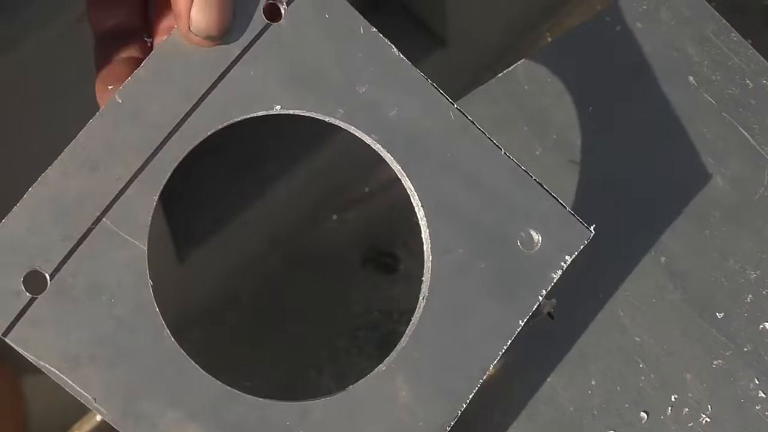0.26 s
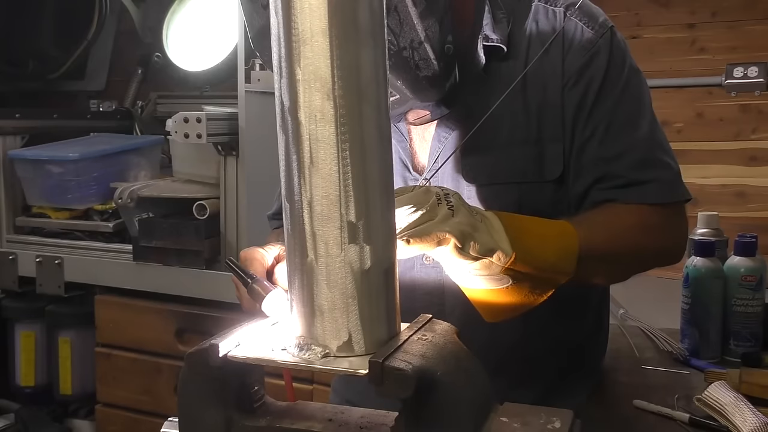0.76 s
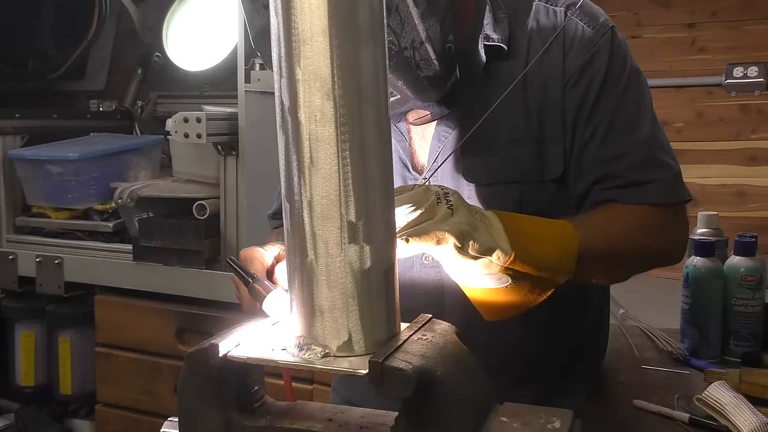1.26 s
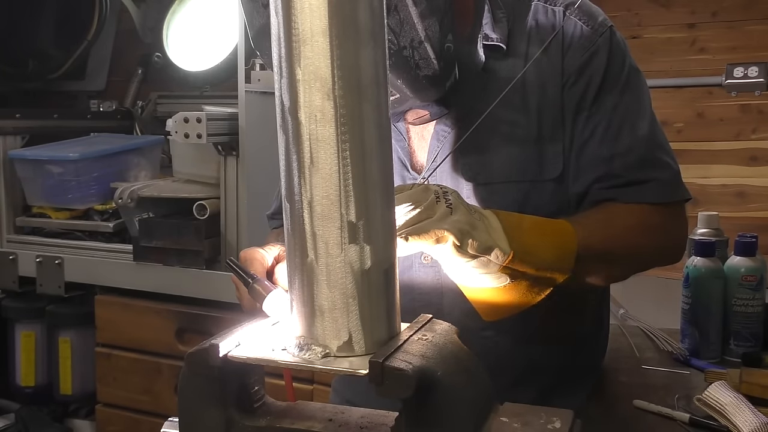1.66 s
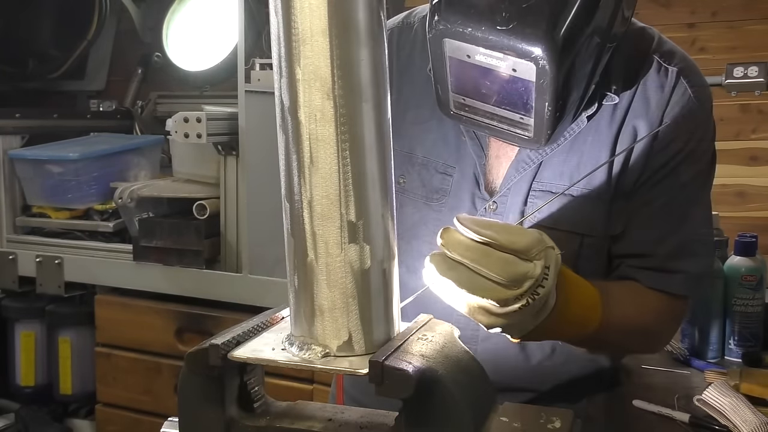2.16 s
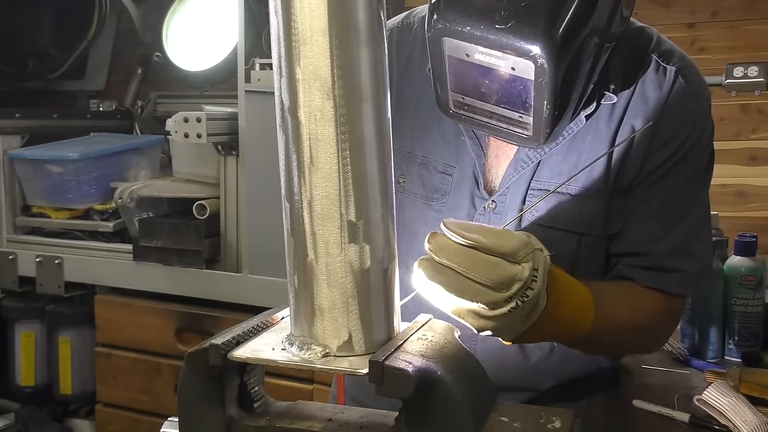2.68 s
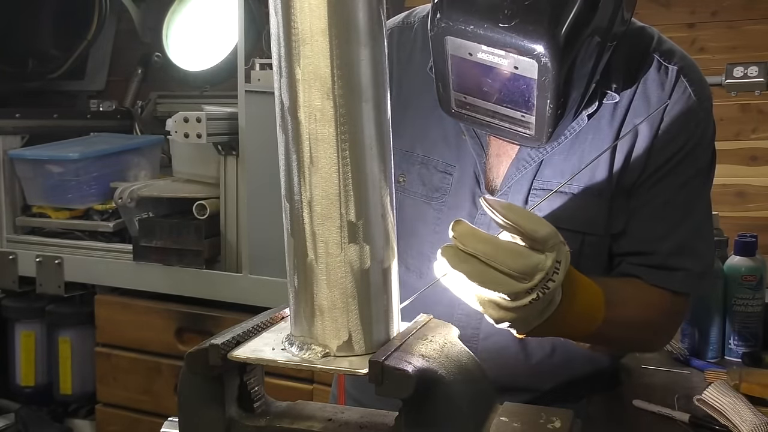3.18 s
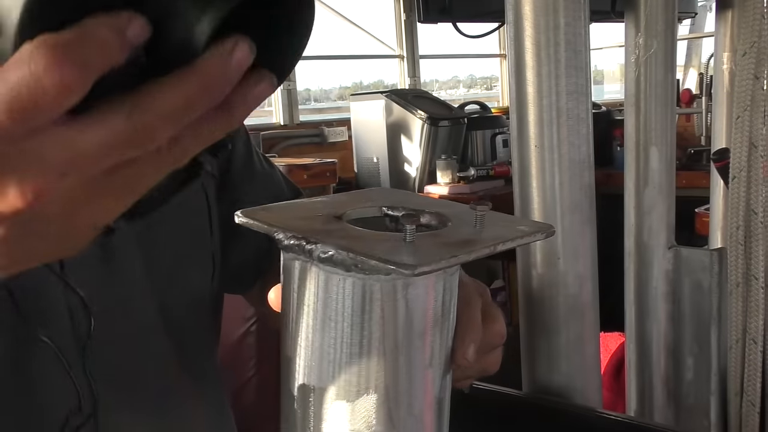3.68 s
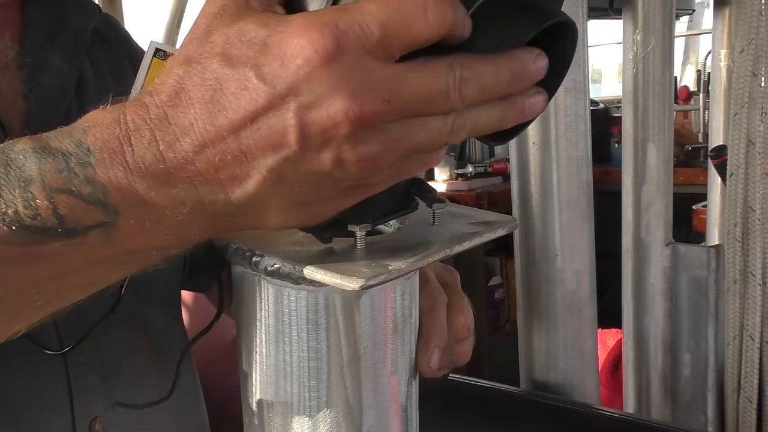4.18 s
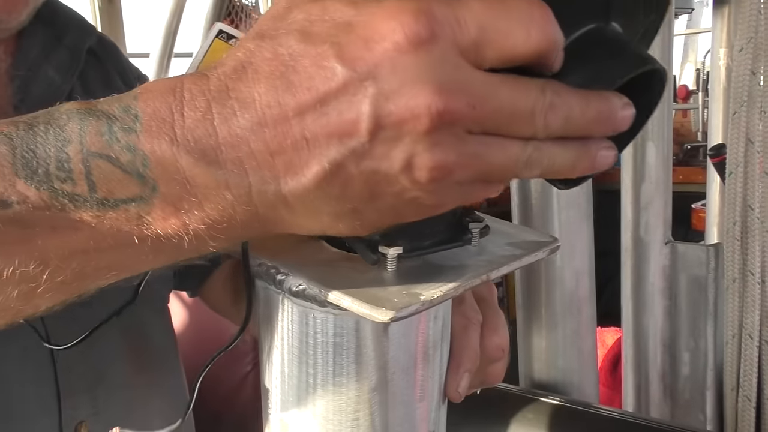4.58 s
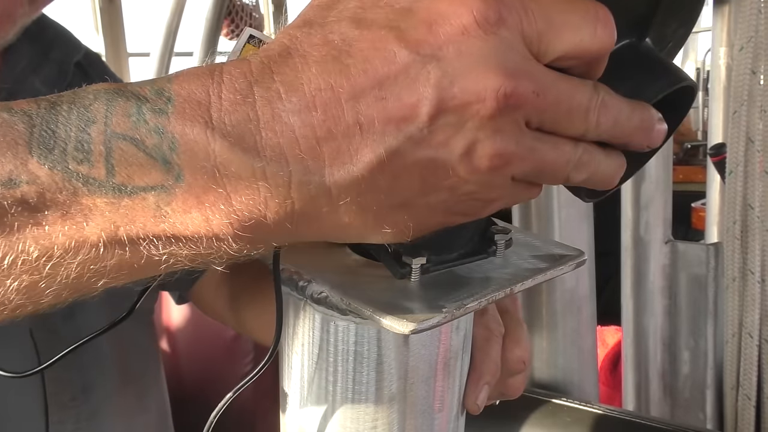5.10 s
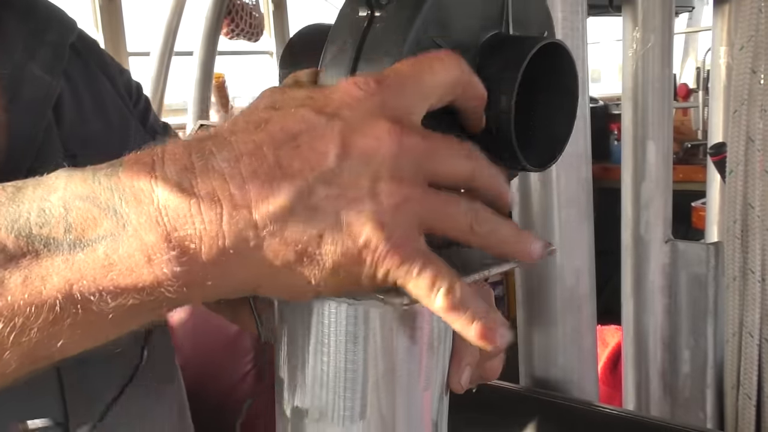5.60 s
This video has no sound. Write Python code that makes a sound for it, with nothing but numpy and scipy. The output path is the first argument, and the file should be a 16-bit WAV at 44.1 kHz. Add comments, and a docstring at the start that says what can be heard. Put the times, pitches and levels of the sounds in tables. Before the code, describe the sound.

A saw motor whines downward for half a second, then a harsh welding arc buzzes and crackles before hands knock a plastic housing onto metal.

```python
"""A workshop, heard in mono as three scenes cut together.
A saw motor runs down: gliding motor tones and rushing air, with fixed blade tones ringing as they are shaken.
An alternating-current welding arc buzzes on aluminium: clicks at each current flip with sizzle between them;
one weld fades into another. Then hands seat a plastic blower housing on an aluminium flange: decaying tones
make the knocks, short sine blips the ticks, and shaped noise the rubbing and low rumble."""
import sys
import numpy as np
from scipy import signal
from scipy.fft import rfft, irfft
from scipy.io import wavfile
from scipy.ndimage import uniform_filter1d

SR = 44100
rng = np.random.default_rng(int(sys.argv[2]) if len(sys.argv) > 2 else 0)


def int16_out(signal):
    """Quantize to a 16-bit WAV file."""
    q = np.round(np.clip(np.atleast_2d(signal).T, -1, 1) * 32767)
    wavfile.write(sys.argv[1], SR, q.astype(np.int16))


N = 257664
TIME = np.arange(N) / SR

# All levels are relative within their own sound unless a comment says otherwise.
# Motor, fan and gear tones: multiples of the shaft rate
SHAFT_MULTIPLES = [1, 7, 8, 9, 10, 12, 13, 14, 15, 16, 17, 24]
# Level of each of those tones: start_db, cut_db
SAW_TONE_LEVELS = [(-28.5, -43), (-36, -18), (-19.5, -20.5), (-18, -22), (-33, -15), (-17.5, -23.5),
                   (-32, -17), (-29, -18), (-16, -28), (-7, -26), (-34, -29), (-24, -26)]
# Ringing tones of the blade: pitch_hz, width_hz (each dies 60 dB in 0.51 / width_hz seconds), level_db
BLADE_MODES = [(2700, 42, -16), (3200, 72, -26), (3550, 30, -20), (3750, 25, -13.5), (3620, 25, -16),
               (4030, 20, -17), (4146, 20, -11.5), (4300, 18, -17), (4280, 93, -31), (5570, 30, -15.5),
               (7450, 150, -12.5), (10550, 370, -8)]
# Colour of the saw's cooling air: pitch_hz, level_db (per Hz)
SAW_AIR_COLOUR = [(18, -40), (30, -24), (134, -9.5), (215, -19), (266, -13), (319, -16), (415, -7),
                  (1190, -1), (1760, -3.5), (2410, -1), (2680, -1), (4190, -1), (4780, -4), (11100, -12.5),
                  (16000, -11.5)]
# Timing of each weld: first_flip_s, cycles_hz, wait_for_flip_back_s, pulse_sign
WELD_CYCLE_1 = (.49607, 59.413, .00342, 1)
WELD_CYCLE_2 = (1.59564, 59.417, .00343, -1)
# Colour of the crack at the flip back: pitch_hz, level_db (per Hz)
CRACK_COLOUR_1 = [(60, -56), (300, -29), (600, 3), (1200, 2), (2400, 2), (3600, 5.5), (5000, 2.5),
                  (7100, -4.5), (9000, -2), (11500, 2.5), (14300, 2.5), (16000, -4)]
CRACK_COLOUR_2 = [(60, -33.5), (300, -8), (600, -5), (1200, 3.5), (2400, 4), (3600, 1.5), (5500, 1.5),
                  (9000, -4.5), (12000, 3), (14500, 0), (16000, -1)]
# Colour of the sizzle: pitch_hz, level_db (per Hz)
SIZZLE_COLOUR_1 = [(60, -10), (200, -15), (500, -10), (1000, 0), (2000, -4), (3600, -1), (4600, 0),
                   (6200, -4.5), (11000, 6), (16000, -4)]
SIZZLE_COLOUR_2 = [(60, -56), (200, -7.5), (500, -6.5), (1000, -2.5), (2000, -4.5), (3200, -3), (4600, 1.5),
                   (6500, -5), (9000, 6), (12000, 0), (16000, 0.5)]
# Main reflections off bench and work: delay_ms, signed_share
REFLECTIONS_1 = [(1.52, -0.37), (1.86, 0.23), (2.61, 0.27), (3.76, -0.28), (4.04, -0.24), (5.31, 0.32),
                 (5.65, -0.32), (8.78, -0.22), (12.63, 0.2)]
REFLECTIONS_2 = [(0.48, -0.48), (1.0, -0.3), (1.16, 0.3), (1.41, 0.37), (1.59, 0.62), (2.56, 0.46),
                 (4.65, -0.29), (7.35, -0.35), (9.89, -0.3)]
# Strengthened harmonics of the arc's buzz: pitch_hz, level_db
BUZZ_HARMONICS_1 = [(297, -23), (594, -50), (951, -42), (1129, -38), (1188, -54), (1426, -43),
                    (1485, -51.5), (1782, -42), (2079, -44), (3565, -45.5)]
BUZZ_HARMONICS_2 = [(178, -26), (297, -36.5), (594, -27), (653, -28), (891, -35), (951, -38.5), (1040, -45),
                    (1129, -34.5), (1188, -39), (1485, -37.5), (1842, -34.5), (3060, -46), (3327, -50),
                    (3921, -29)]
# Sputter surges of the arc: peak_s, build_up_s, level_db
SPUTTER_SURGES = [(0.599, 0.0072, -39), (1.555, 0.0035, -30.5), (2.1, 0.18, -32.5), (2.18, 0.048, -29),
                  (2.261, 0.042, -32.5), (2.55, 0.051, -37), (2.64, 0.14, -27.5), (2.823, 0.017, -32),
                  (2.87, 0.047, -27.5), (2.94, 0.015, -39), (3.313, 0.008, -24), (3.39, 0.036, -41),
                  (3.45, 0.013, -37)]
# Level of the second arc as the torch moves: time_s, level_db
ARC_2_LEVEL = [(1.6, 4), (2.1, 0), (2.5, -1.5), (2.78, -1), (3.0, 0), (3.2, -2.5), (3.47, -2)]
# Strokes of the hands over the housing: peak_s, build_up_s, dying_s, rub_db, treble_db, scrape_hz
HAND_STROKES = [(3.53, 0.059, 0.023, -47.5, -45.5, 4060), (3.615, 0.015, 0.038, -55, -59, 2330),
                (3.68, 0.038, 0.027, -47, -63, 1300), (3.875, 0.02, 0.045, -38, -56, 1700),
                (3.945, .02, .02, -48, -60, 1510), (3.99, 0.013, 0.0047, -41, -48, 1340),
                (4.055, 0.019, 0.018, -46.5, -68, 1570), (4.1, .01, 0.0067, -57, -74, 2500),
                (4.49, 0.025, 0.02, -31, -51, 1470), (5.33, 0.078, 0.19, -57, -64, 1820),
                (5.47, 0.032, 0.057, -43, -75, 900), (5.6, 0.013, 0.026, -48, -50, 3750),
                (5.69, 0.042, 0.063, -41, -44.5, 1480), (5.779, 0.067, 0.019, -37, -40.5, 1220)]
# Colour of the low rumble: pitch_hz, level_db (per Hz)
RUMBLE_COLOUR = [(15, -73), (25, -29), (80, -9.5), (118, 2), (150, -4), (221, 2), (375, -16), (500, -13.5),
                 (650, -16), (1100, -120)]
# Level of the rumble over time: time_s, level_db
RUMBLE_LEVELS = [(3.48, -37.5), (4.17, -38), (4.7, -43.5), (5.4, -43.5), (5.6, -49.5), (5.84, -43)]
# Colour of the rubbing: pitch_hz, level_db (per Hz)
RUB_COLOUR = [(300, -2.5), (600, 2), (1300, -0.5), (2000, -1), (2900, -5.5), (3800, -2), (5000, -11.5),
              (8000, -28)]
# Colour of the rubbing's treble: pitch_hz, level_db (per Hz)
RUB_TREBLE_COLOUR = [(3000, -46), (5000, 8), (8000, 10), (12000, 6.5), (16000, 5.5)]
# Knocks of the housing: start_s, level_db, hollow_boom_db, brightness_db, flange_ring_db, skid_ms
HOUSING_KNOCKS = [(3.666, -22.5, -10, 8, 1, 0.48), (3.8636, -24, -5, 9.5, -6, 0.31),
                  (4.019, -35, -8, -3, -15, 2.7), (4.262, -41, -4, 4, 3, 1),
                  (4.3122, -5.5, -1.5, 8.5, 9, 0.098), (4.355, -10.5, 5.5, 2, 13, 0.12),
                  (4.4455, -23.5, -4, 1, -10, 0.24), (4.465, -37, 4, 14, -10, 2),
                  (4.478, -4, -14.5, -4, -2, 0.18), (4.497, -23, 2.5, 4, 5.5, 1.13),
                  (4.652, -46, 15, -18, -20, .1), (4.922, -37, 6, -5, -13, 0.093),
                  (5.107, -45, 16, -8, -15, 0.44), (5.3828, -50.5, 27, 5, -3, 2.4),
                  (5.427, -7.5, 4, 5, -4, 1.59), (5.4378, -9, 12, -20, -30, 1.25),
                  (5.584, -46, 7, 11, -8, 2.8), (5.716, -19, -11.5, 2, -14, 7),
                  (5.76, -25.5, -18, -9, -20, 3.3)]
# Tones of the plastic housing: pitch_hz, level_db, decay_s (to -60 dB; knocks rescale it)
HOUSING_MODES = [(460, 20.5, 0.0081), (570, 3, 0.049), (663, 14, 0.039), (800, 17.5, 0.023),
                 (1040, 19, 0.02), (1185, 2, 0.083), (1640, 1.5, 0.082), (1757, 19, 0.015),
                 (1970, 9, 0.045), (2650, 8, 0.0048)]
# Tones of the metal flange: pitch_hz, level_db, decay_s (to -60 dB)
FLANGE_MODES = [(2050, -11, .2), (2260, -10, 0.17), (3030, -19, 0.12), (3130, -6.5, 0.21),
                (3280, -18, 0.39), (3760, 3, 0.13), (3870, 22, 0.009), (3800, -16, 0.11), (4023, -8, 0.27),
                (4235, -9.5, 0.43), (4960, -13, 0.28), (5300, -8, 0.2), (6700, -5, .08), (7600, -4, .12),
                (8900, -1, 0.13), (13870, -1, .1)]
# Thin ticks: start_s, level_db, pitch_hz
THIN_TICKS = [(4.477, -21, 10500), (4.484, -31, 11000), (4.505, -18, 3500), (4.63, -33, 6000),
              (4.875, -33, 8000), (4.957, -33, 5500), (5.487, -32, 9500), (5.78, -19, 3200),
              (5.83, -25, 4480)]

# Saw: shaft rate at the start, and its loss each second
SAW_HZ, SAW_SLOWING_HZ_PER_S = 282, 113
SAW_DB, SAW_CUT_S = -12.5, 0.5035
BLADE_DRIVE_DB = 4  # a tone gliding through a blade mode shakes it this much harder than the air does
# Welds
WELD_FADE_S, WELD_CUT_S = (1.682, 2.24), 3.472
SPIT_HZ, FRESH_SHARE = 6000, 0.5  # spit and sizzle lie above this pitch; sizzle that is new each cycle
SPUTTER_DB, SURGE_FALL_S, BURST_FALL_S = -54, 0.044, 0.006  # quiet sputter; time for a fall to 37 %
SURGE_DUCK_DB = 70  # the clicks weaken by this many dB per unit of sputter amplitude
PING_HZ, PING_T60_S, PING_DB = 3250, 0.023, -2  # a surging relight also rings this pitch
SCATTER_T60_S, SCATTER_HZ = 0.02, 4200  # dense small reflections near the arc, treble only
HARMONIC_DAMP_HZ = 3940  # strengthened harmonics at this pitch die twice as fast as the lowest pitches
WALL_DB, WALL_T60_S = -26.5, 0.1
# Hands
REST_RUB_DB, REST_TREBLE_DB = -9.5, -17  # faint rubbing between strokes, relative to the rumble
SCRAPE_DB, SCRAPE_T60_S = 1, 0.013  # pitched scrape relative to the hiss; ring time of its pitch
SLIPS_PER_S = 43  # slips that shake each housing mode
# Knocks
KNOCK_T60_S, CONTACT_MS = 0.034, 1.47
FLANGE_DB, KNOCK_TOP_DB = -12.5, -15.5
ROOM_T60_S, ROOM_DB = 0.33, -16
TOP_HZ = 15750


def undb(db):
    """Turn decibels into an amplitude factor."""
    return 10 ** (np.asarray(db) / 20)


def unit(x):
    """Scale a sound to an average (RMS) level of 1."""
    return x / np.sqrt(np.mean(x ** 2))


def noise():
    """Fresh white noise, as long as the whole sound."""
    return rng.standard_normal(N)


def curves(table):
    """Columns of a table joined by straight lines in time."""
    s, *columns = np.transpose(table)
    return [np.interp(TIME, s, c) for c in columns]


def colour(x, spectrum, size=2048, causal=True):
    """Filter through (pitch, level) points: reacting as early as possible, or symmetric in time."""
    hz, db = np.transpose(spectrum)
    bins_hz = np.arange(size // 2 + 1) * SR / size
    log_gain = np.interp(np.log(bins_hz + 1), np.log(hz), db) * np.log(10) / 20
    if not causal:
        kernel = np.roll(irfft(np.exp(log_gain)), size // 2)
        return signal.oaconvolve(x, kernel)[size // 2:size // 2 + len(x)]
    # folding the cepstrum gives the minimum-phase filter
    cepstrum = irfft(log_gain)
    cepstrum[1:size // 2] *= 2
    cepstrum[size // 2 + 1:] = 0
    return signal.oaconvolve(x, irfft(np.exp(rfft(cepstrum))))[:len(x)]


def highpass(x, hz, order=2):
    """Keep what lies above a pitch."""
    return signal.sosfilt(signal.butter(order, hz, "high", fs=SR, output="sos"), x)


def ring(x, hz, t60):
    """One tone that x sets ringing and that dies by 60 dB in t60 seconds."""
    pole = np.exp(2j * np.pi * hz / SR - np.log(1000) / (t60 * SR))
    return signal.lfilter([1], [1, -pole], x).imag


def clicks(s, size, length=N):
    """Impulses at exact times, even between samples (windowed sinc)."""
    at, taps, out = np.asarray(s) * SR, np.arange(-7, 9), np.zeros(length + 16)
    gap = taps - (at % 1)[:, None]
    places = np.clip(at.astype(int)[:, None] + taps, 0, length)
    shape = np.sinc(gap) * np.cos(np.pi * gap / 18) ** 2
    np.add.at(out, places, shape * np.asarray(size)[:, None])
    return out[:length]


def walk(rate):
    """Random levels, rate of them a second, joined by slopes; spread near 1."""
    k = int(SR / rate)
    return uniform_filter1d(np.repeat(rng.standard_normal(N // k + 1), k), k)[:N]


def swells(s, rise_s, fall_s, db):
    """Amplitude that builds up to each peak and dies away exponentially."""
    late = TIME - s[:, None]
    pace_s = np.where(late < 0, rise_s[:, None], np.reshape(fall_s, (-1, 1)))
    return undb(db) @ np.exp(-np.abs(late) / pace_s)


def cut(start, end, fade_s=0.0035):
    """An edit: sound only between two moments, with short fades."""
    return np.clip(np.minimum(TIME - start, end - TIME) / fade_s, 0, 1)


def saw():
    """Motor tones glide down; the blade's fixed tones ring as air and passing motor tones shake it."""
    shaft_hz = np.maximum(SAW_HZ - SAW_SLOWING_HZ_PER_S * TIME, 100)
    turn = 2 * np.pi * np.cumsum(shaft_hz) / SR
    tones = 0
    for multiple, levels in zip(SHAFT_MULTIPLES, SAW_TONE_LEVELS):
        level_db = np.interp(TIME, (0, SAW_CUT_S), levels) + 3.9 * walk(44.8)
        angle = multiple * (turn + 0.054 * walk(92.5)) + rng.uniform(0, 2 * np.pi)
        tones = tones + undb(level_db) * np.sin(angle)
    on = cut(-1, SAW_CUT_S, fade_s=0.0042)
    blade = 0
    for hz, width_hz, db in BLADE_MODES:
        shake = on * (noise() + undb(BLADE_DRIVE_DB) * tones)
        blade = blade + undb(db - 13.0 + 2 * walk(6.1)) * unit(ring(shake, hz, 0.51 / width_hz))
    air = undb(-2.5 + walk(63.3)) * unit(colour(noise(), SAW_AIR_COLOUR))
    return (np.sqrt(2) * tones + blade + air) * undb(SAW_DB) * on


def sizzle_noise(flips, cycle, burn_s, level):
    """Treble noise burns from each relight until shortly after the flip back, then dies quickly."""
    first, hz, wait, _ = cycle
    burn = lambda age: np.exp(-np.maximum(age - wait - burn_s, 0) / 0.00072)
    # most of it repeats from cycle to cycle, the rest is new each time
    pattern = burn(TIME[:512]) * rng.standard_normal(512)
    same = signal.oaconvolve(clicks(flips, undb(level)), pattern)[:N]
    fresh = burn((TIME - first) % (1 / hz)) * noise()
    return highpass(same + FRESH_SHARE * fresh, SPIT_HZ)


def sputter_bursts(cycle, snap, burst_level, sputter):
    """In a surge each relight bursts unevenly in one band of noise and rings a ping."""
    first, hz, _, _ = cycle
    k = np.clip(((TIME - first) * hz).astype(int), 0, len(burst_level) - 1)
    since = (TIME - first) % (1 / hz)
    burst = np.exp(-since / BURST_FALL_S) * undb(1.8 * burst_level[k])
    band = [(1500, -33), (2900, 4.5), (3500, 8), (4300, -5.0), (6500, -34)]
    bursts = sputter * unit(colour(burst * noise(), band))
    return bursts + sputter * undb(PING_DB) * unit(ring(snap, PING_HZ, PING_T60_S))


def scattered_treble(arc, wander_db):
    """Treble scatters off torch, hands and clamps along three paths; as they move, its colour shifts."""
    treble = highpass(arc, SCATTER_HZ)
    paths = rng.standard_normal((3, 2048)) * 1000 ** (-TIME[:2048] / SCATTER_T60_S)
    mix = undb([wander_db * walk(4.11) for _ in paths])
    mix = mix / np.sqrt(np.mean(mix ** 2, axis=0))
    scatter = 0
    for m, p in zip(mix, paths):
        scatter = scatter + m * signal.oaconvolve(treble, p / np.sqrt(np.sum(p ** 2)))[:N]
    return scatter


def arc_response(echo, harmonics, wait, echo_hz, harmonics_t60):
    """Each arc pulse comes direct, off bench and walls, and with dying tones that strengthen buzz harmonics."""
    delay, share = np.transpose(echo)
    t = np.arange(4096) / SR
    path = 0
    # early reflections keep more edge, those later than 3 ms come back dull
    for edge_hz, some in ((echo_hz, delay < 3), (4500, delay >= 3)):
        dulling = signal.butter(1, min(edge_hz, 20000), fs=SR)
        path = path + signal.filtfilt(*dulling, clicks(delay / 1000, share * some, length=4096))
    for j, (hz, db) in enumerate(harmonics):
        decay = 1000 ** (-t / harmonics_t60 * (1 + hz / HARMONIC_DAMP_HZ))
        path = path + (-1) ** j * undb(db) * np.sin(2 * np.pi * hz * t) * decay
    path[0] += 1
    # the walls return each pulse as the same dense tail
    tail = rng.standard_normal(len(t)) * 1000 ** (-t / WALL_T60_S) * (t > wait)
    path = path + undb(WALL_DB) * colour(tail, [(1500, -30.5), (3000, -0.5), (4500, 1), (7000, -13)])
    return path / np.sqrt(np.sum(path ** 2))


def weld(cycle, click_db, crack, sizzle, echo, harmonics, thud_hz, thud_db, spit_db, burn_s, glance, wander_db,
         steady_db, rest_db, gas_top_db, echo_hz, harmonics_t60, fan_hz, fan_db):
    """Current flips twice a cycle: a dull thud at relight, a sharp crack at the flip back, sizzle between."""
    first, hz, wait, sign = cycle
    flips = np.arange(first, N / SR - .02, 1 / hz)
    chance = rng.standard_normal((len(flips), 7)).T
    crack_shift, crack_level, thud_shift, thud_level, spit_shift, spit_level, sizzle_level = chance
    sharp = clicks(flips + wait + 3e-6 * crack_shift, sign * undb(.4 * crack_level))
    thud = clicks(flips + 8e-6 * thud_shift, sign * undb(thud_db + 0.43 * thud_level))
    thud = signal.filtfilt(*signal.butter(2, thud_hz, fs=SR), thud)
    # the relight also spits: a crack of very uneven strength
    spit = clicks(flips + 5e-5 * spit_shift, sign * undb(spit_db + 6 * spit_level))
    spit = signal.sosfiltfilt(signal.butter(2, SPIT_HZ, "high", fs=SR, output="sos"), spit)
    s, rise_s, surge_db = np.transpose(SPUTTER_SURGES)
    sputter = undb(SPUTTER_DB) + swells(s, rise_s, SURGE_FALL_S, surge_db)
    arc = undb(click_db - SURGE_DUCK_DB * sputter) * unit(colour(sharp + thud + spit, crack, causal=sign < 0))
    fizz = sizzle_noise(flips, cycle, burn_s, sizzle_level)
    arc = arc + undb(steady_db) * unit(colour(fizz, sizzle))
    # an even, duller hiss of shielding gas lies under the sizzle
    gas = colour(colour(noise(), sizzle), [(4000, 0), (12000, gas_top_db)])
    gas = undb(rest_db) * unit(gas)
    snap = clicks(flips + 2e-5 * spit_shift, sign * undb(2.5 * spit_level))
    surge = sputter_bursts(cycle, snap, spit_level, sputter)
    # in a surge both flips also crack in one band close to that of the bursts
    surge_crack = colour(snap + sharp, [(2300, -31.5), (3100, 5.0), (4300, 5.5), (5500, -33.5)])
    arc = arc + sputter * undb(1.5) * unit(surge_crack)
    arc = arc + sputter * undb(-14.0) * unit(colour(snap, crack))
    arc = arc + glance * scattered_treble(arc, wander_db)
    path = arc_response(echo, harmonics, wait, echo_hz, harmonics_t60)
    near = signal.oaconvolve(arc, path)[:N] + surge + gas
    # low drone of the welder: noise through the same narrow ring twice
    fan = undb(fan_db) * unit(ring(ring(noise(), fan_hz, 0.12), fan_hz, 0.12))
    return highpass(near, 120, order=4) + fan  # the arc, sizzle and gas keep nothing deep below 120 Hz; only the drone lies lower


def hands():
    """Low rumble, and skin and cable rubbing on plastic: noise with scattered slips that rattle the housing."""
    s, rise_s, fall_s, rub_db, treble_db, scrape_hz = np.transpose(HAND_STROKES)
    rumble_db = curves(RUMBLE_LEVELS)[0]
    rumble = undb(rumble_db + 2.0 * walk(6.7)) * unit(colour(noise(), RUMBLE_COLOUR, size=8192))
    # about 120 slips a second roughen the noise
    slips = (rng.random(N) < 120 / SR) * undb(3.75 * rng.exponential(size=N))
    slips = uniform_filter1d(slips, size=60) * 60
    grain = undb(2.7 * walk(30)) * (1 + 0.26 * slips)
    # single slips shake the housing modes, each mode at moments of its own
    rattle = 0
    for hz, _, decay_s in HOUSING_MODES:
        pushes = (rng.random(N) < SLIPS_PER_S / SR) * noise()
        rattle = rattle + unit(ring(pushes, hz, max(decay_s, .02)))
    hiss = unit(colour(grain * noise(), RUB_COLOUR))
    rub = undb(rumble_db + REST_RUB_DB) * hiss
    for k, hz in enumerate(scrape_hz):
        scrape = unit(ring(unit(rattle) + 0.25 * hiss, hz, SCRAPE_T60_S))
        stroke = swells(*(c[k:k + 1] for c in (s, rise_s, fall_s, rub_db)))
        rub = rub + stroke * (hiss + undb(SCRAPE_DB) * scrape)
    treble_level = undb(rumble_db + REST_TREBLE_DB) + swells(s, rise_s, fall_s, treble_db)
    treble = treble_level * unit(colour(grain * noise(), RUB_TREBLE_COLOUR))
    return rumble + rub + treble


def knock(t, low, metal, ring_db, skid_ms):
    """One knock rings housing and flange tones and throws a short noisy crack; metal contact brightens it."""
    # a glancing knock skids: it swells for a moment before it starts to die
    skid_s = max(skid_ms, 1000 / SR) / 1000
    age = np.maximum(t - skid_s, 0)
    draw = rng.standard_normal((2, len(HOUSING_MODES) + len(FLANGE_MODES)))
    # the grip detunes the plastic
    modes = [(hz * (1 + 0.018 * b), db, decay_s * KNOCK_T60_S / 0.071)
             for (hz, db, decay_s), b in zip(HOUSING_MODES, draw[1])]
    modes += [(hz, db + FLANGE_DB + ring_db, decay_s) for hz, db, decay_s in FLANGE_MODES]
    body = 0
    for (hz, db, decay_s), a, b in zip(modes, *draw):
        # every mode is a close pair that beats
        pair = np.sin(2 * np.pi * hz * t) * np.cos(2 * np.pi * hz * 0.0032 * b * t)
        body = body + undb(db + 2 * a) * pair * 1000 ** (-age / decay_s)
    fading = 1000 ** (-age / (0.47 * KNOCK_T60_S)) + undb(2.0) * 1000 ** (-age / (2.1 * KNOCK_T60_S))
    crack = 1.25 * rng.standard_normal(len(t)) * fading
    contact = 1 - np.exp(-t * 1000 / CONTACT_MS)  # the contact builds up briefly
    onset = contact * np.minimum(t / skid_s, 1) ** 2
    top = KNOCK_TOP_DB + 0.91 * metal
    return colour(onset * (body + crack), [(100, low - 22), (250, low - 8), (550, low), (1500, 0.016),
                                           (3600, metal - 2), (7000, top - 4), (16000, top - 7)])


def knocks():
    """All knocks, plus ticks (very short sine blips), answered by the room's dying noise tail."""
    out, t = np.zeros(N + 10240), np.arange(10240) / SR
    for s, db, low, metal, ring_db, skid_ms in HOUSING_KNOCKS:
        start = int(s * SR)
        out[start:start + len(t)] += undb(db - 11.5) * knock(t, low, metal, ring_db, skid_ms)
    for s, db, hz in THIN_TICKS:
        start = int(s * SR)
        blip = np.sin(2 * np.pi * hz * t[:400]) * np.exp(-t[:400] / 0.00023)
        out[start:start + 400] += undb(db) * blip
    tail = rng.standard_normal(len(t)) * 1000 ** (-t / ROOM_T60_S) * (t > .004)
    tail = colour(tail, [(200, -1.5), (2000, 6.5), (8000, -1.5)])
    room = signal.oaconvolve(out, tail / np.sqrt(np.sum(tail ** 2)))[:N]
    return out[:N] + undb(ROOM_DB) * room


def scene():
    """Saw, then the two welds in a crossfade, then the hands and knocks; the same on both channels."""
    # the first arc stands free: little of its treble scatters (glance)
    first = weld(
        WELD_CYCLE_1, crack=CRACK_COLOUR_1, sizzle=SIZZLE_COLOUR_1, echo=REFLECTIONS_1,
        harmonics=BUZZ_HARMONICS_1, click_db=-20.0, thud_hz=2950, thud_db=4.5, spit_db=-11.5, burn_s=0.0016,
        glance=0.16, wander_db=0.0, steady_db=-34.5, rest_db=-34.5, gas_top_db=-13.5, echo_hz=4560,
        harmonics_t60=0.088, fan_hz=81, fan_db=-77)
    second = weld(
        WELD_CYCLE_2, crack=CRACK_COLOUR_2, sizzle=SIZZLE_COLOUR_2, echo=REFLECTIONS_2,
        harmonics=BUZZ_HARMONICS_2, click_db=-20.0, thud_hz=5260, thud_db=0.0, spit_db=-18, burn_s=0.0026,
        glance=0.69, wander_db=12, steady_db=-27.0, rest_db=-27.5, gas_top_db=-12.5, echo_hz=6200,
        harmonics_t60=0.063, fan_hz=116.5, fan_db=-66.0)
    fade = np.pi / 2 * np.interp(TIME, WELD_FADE_S, (0, 1))
    arcs = first * np.cos(fade) + second * undb(curves(ARC_2_LEVEL)[0]) * np.sin(fade)
    welding = arcs * cut(SAW_CUT_S - .007, WELD_CUT_S)
    seating = (hands() + knocks()) * cut(WELD_CUT_S - .003, 9)
    mono = saw() + welding + seating
    return np.array([mono, mono])


def record(dry):
    """Peaks clip at full scale; a steep filter removes the top."""
    lowpass = signal.ellip(10, .2, 80, TOP_HZ, fs=SR, output="sos")
    return signal.sosfilt(lowpass, np.clip(dry, -1, 1))


dry = scene()
out = record(dry)
int16_out(out)
```